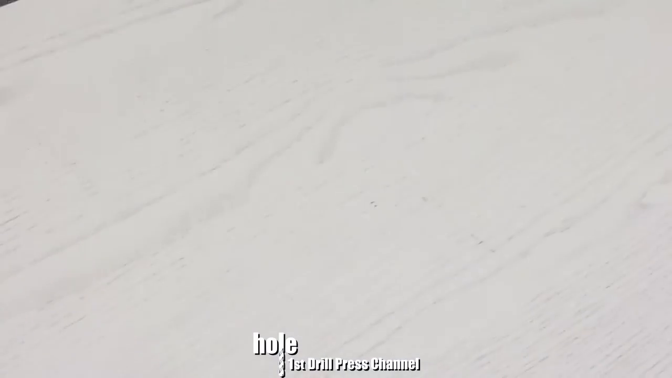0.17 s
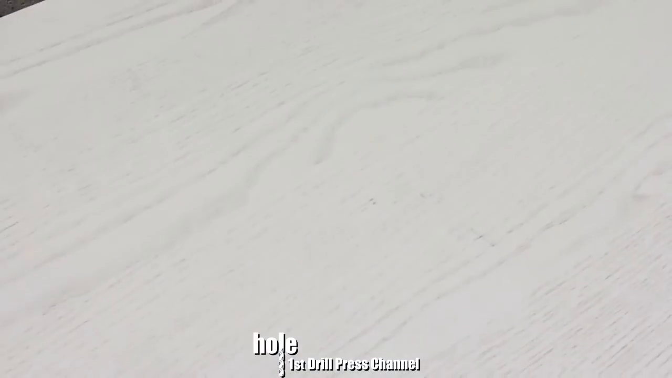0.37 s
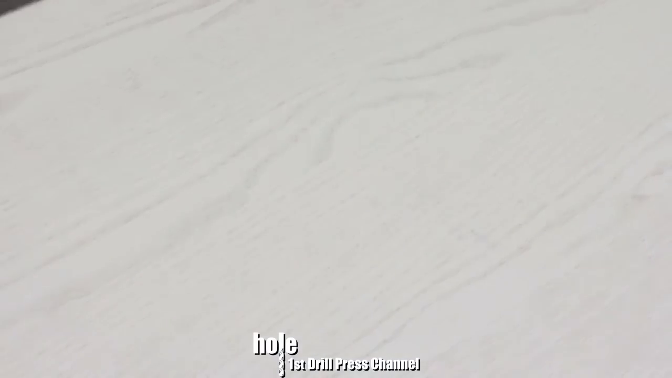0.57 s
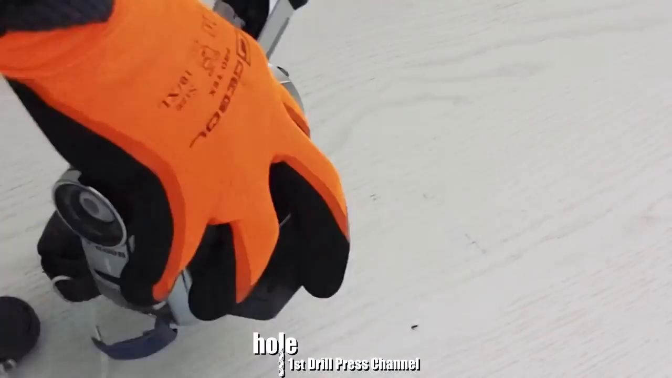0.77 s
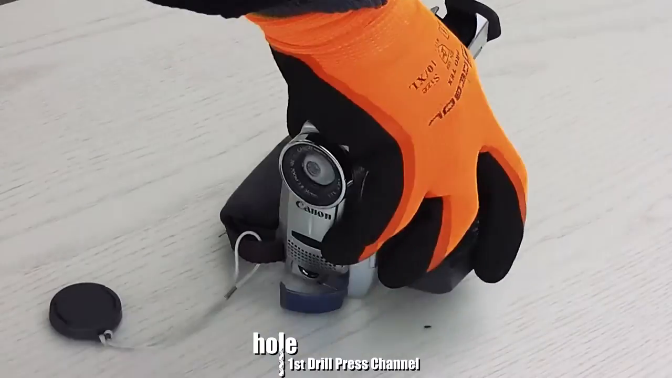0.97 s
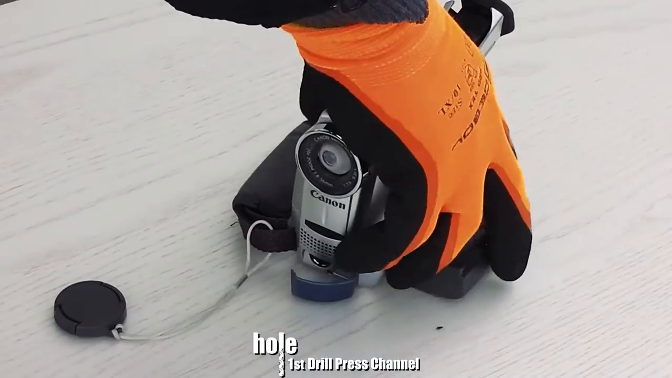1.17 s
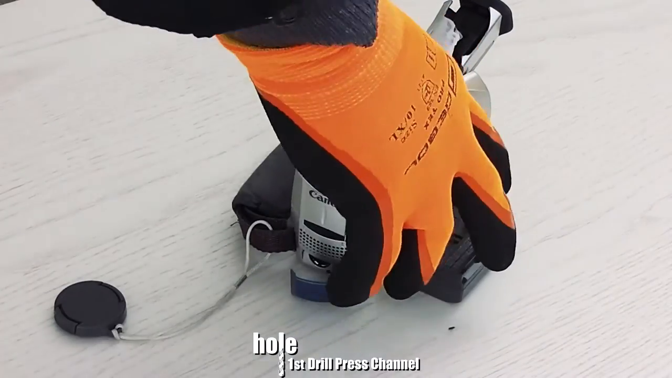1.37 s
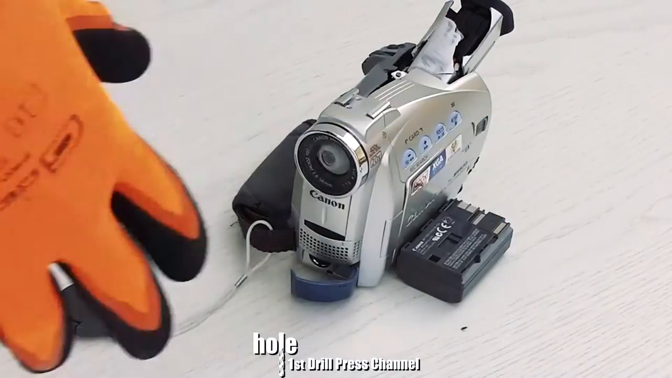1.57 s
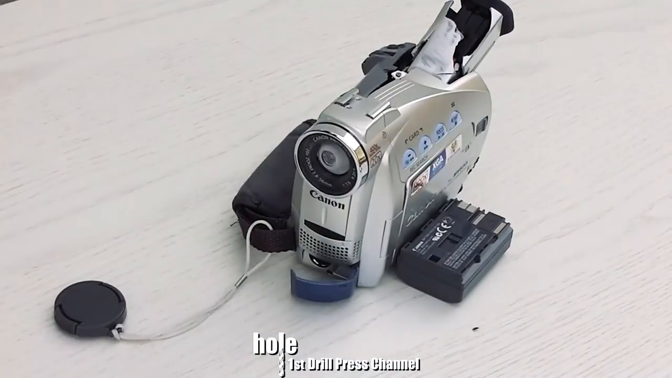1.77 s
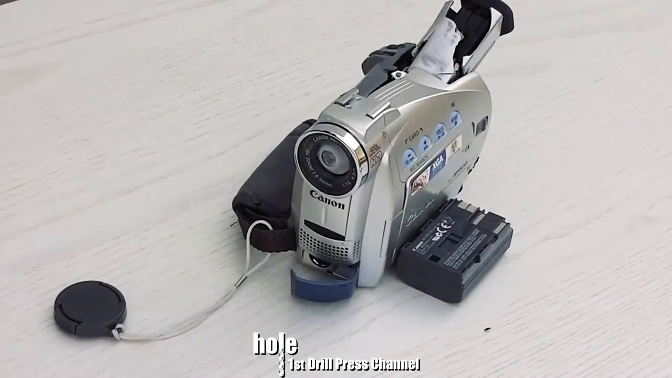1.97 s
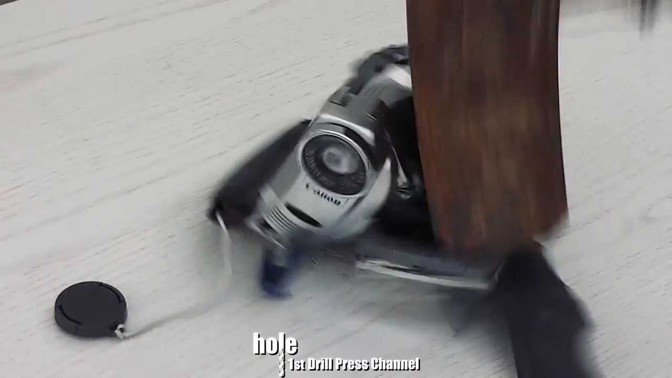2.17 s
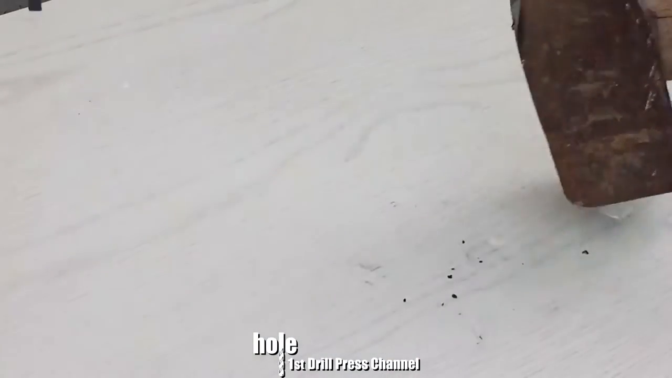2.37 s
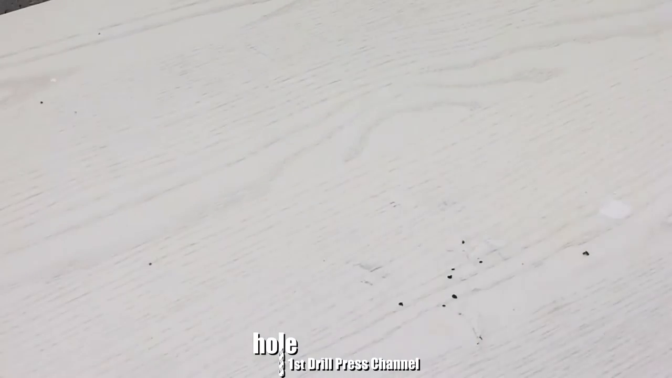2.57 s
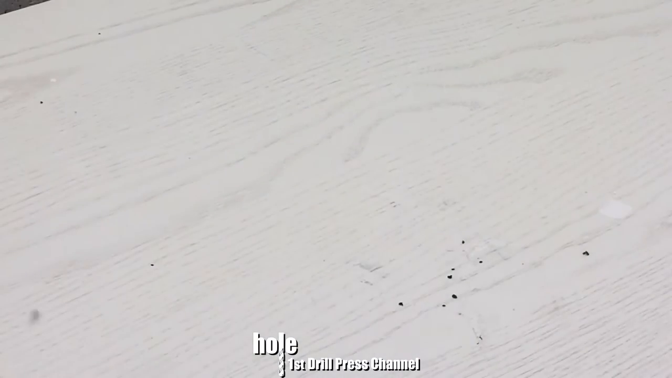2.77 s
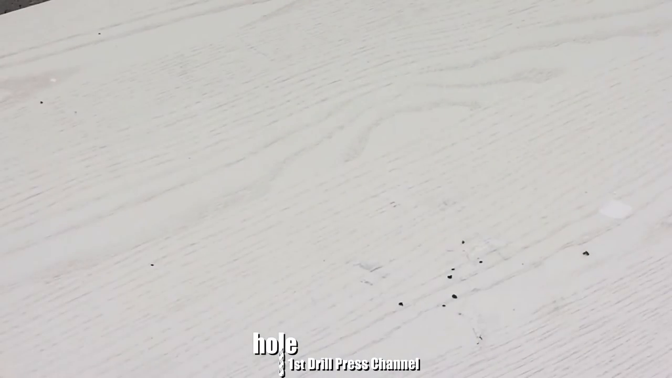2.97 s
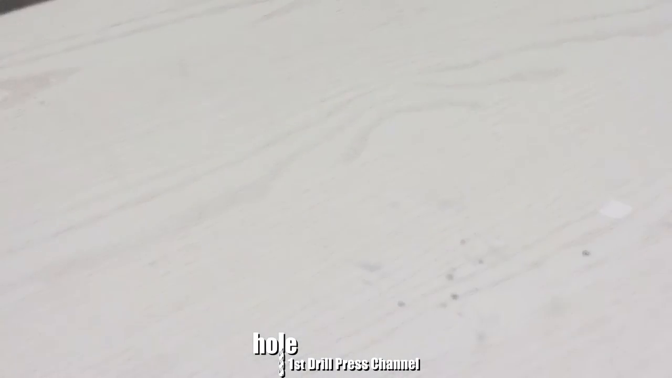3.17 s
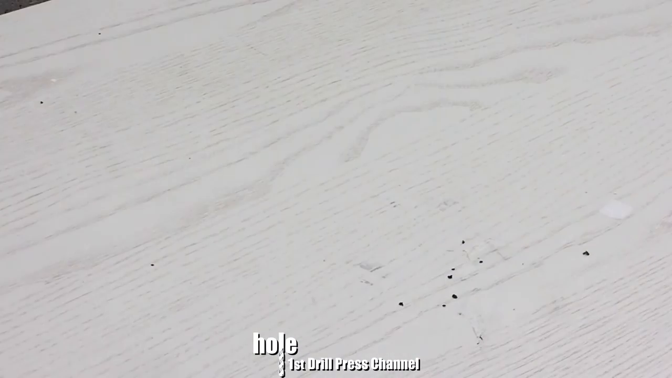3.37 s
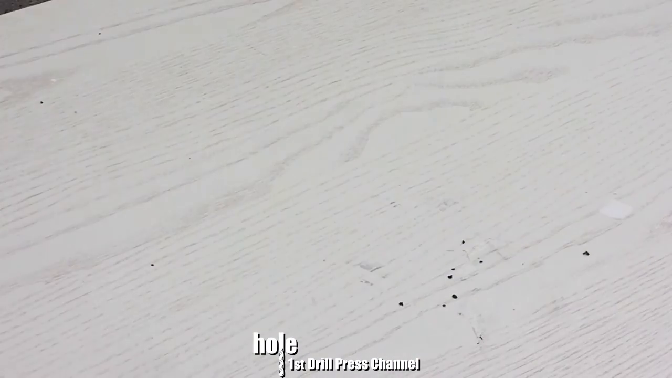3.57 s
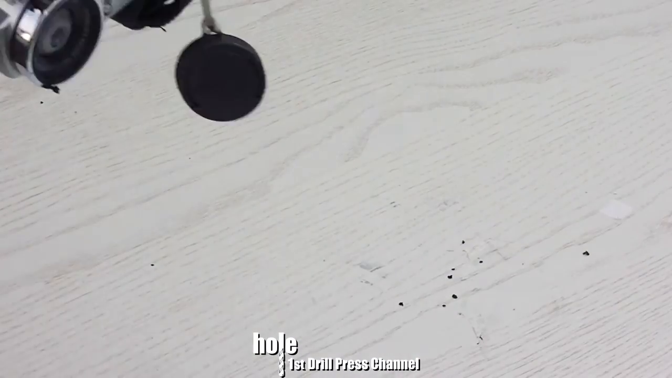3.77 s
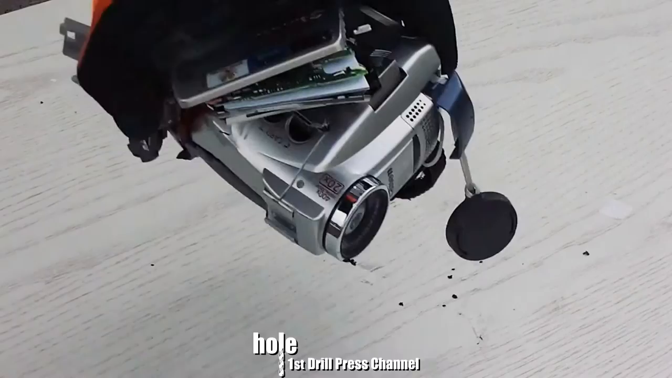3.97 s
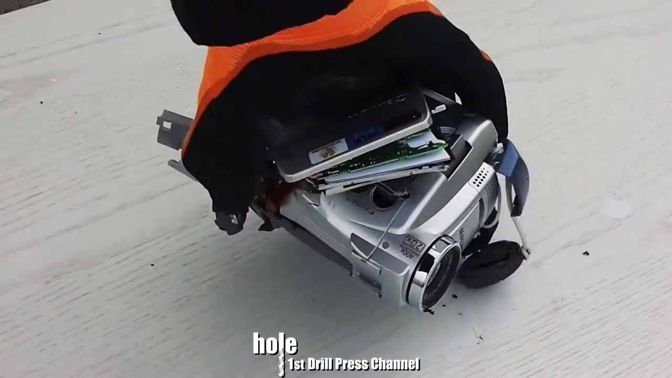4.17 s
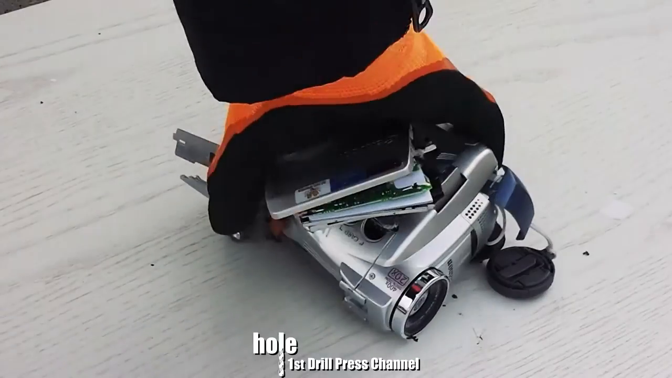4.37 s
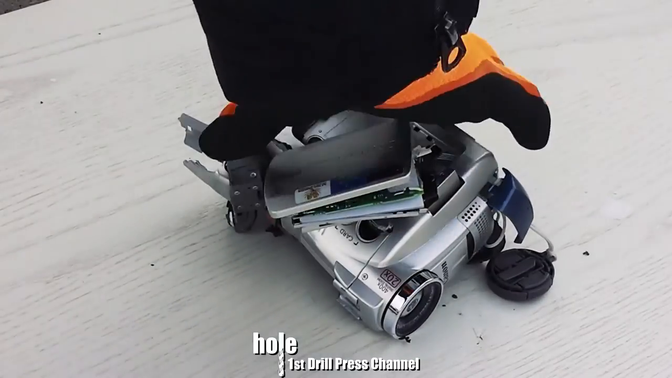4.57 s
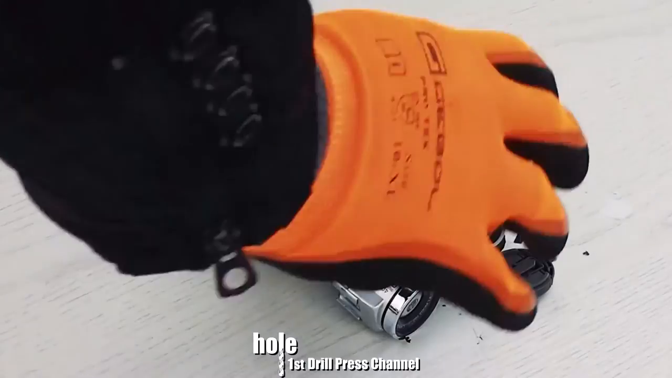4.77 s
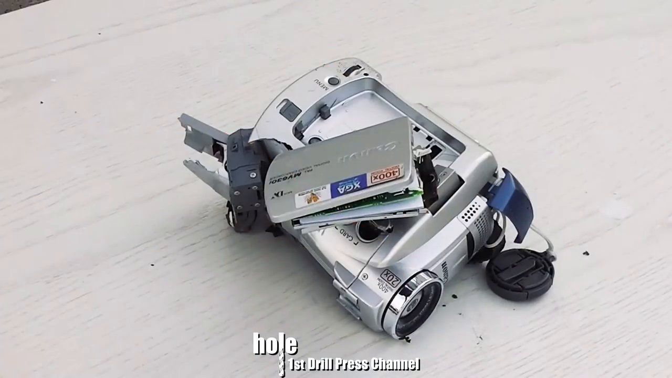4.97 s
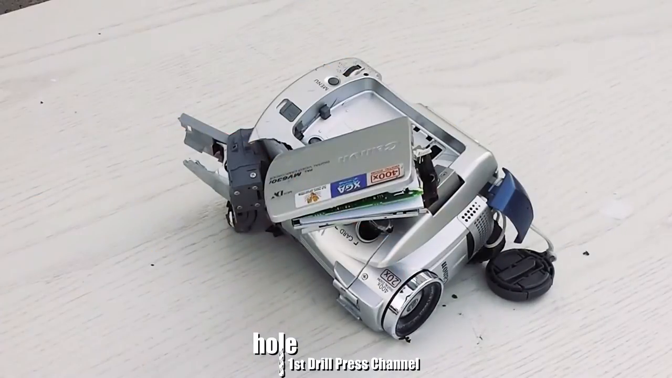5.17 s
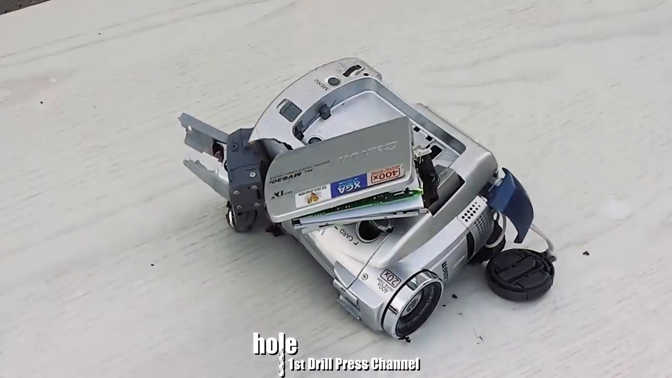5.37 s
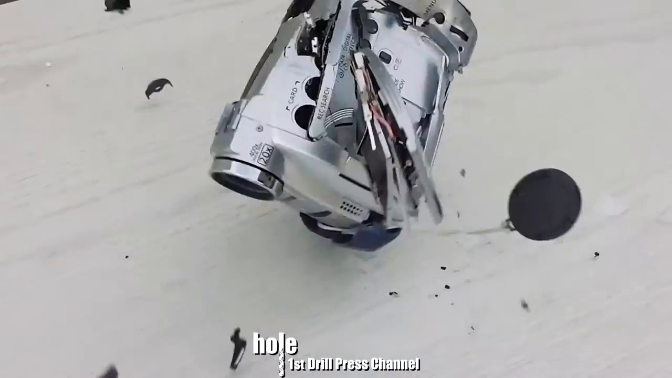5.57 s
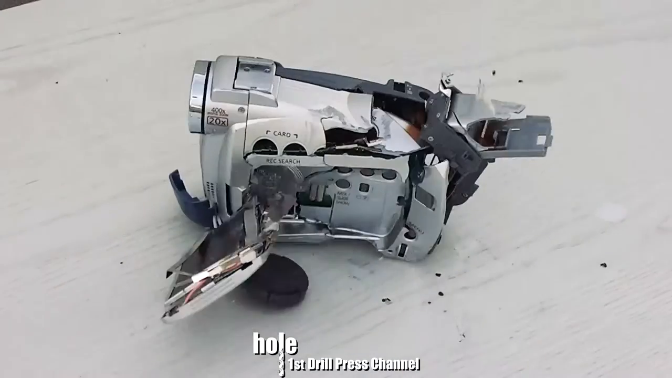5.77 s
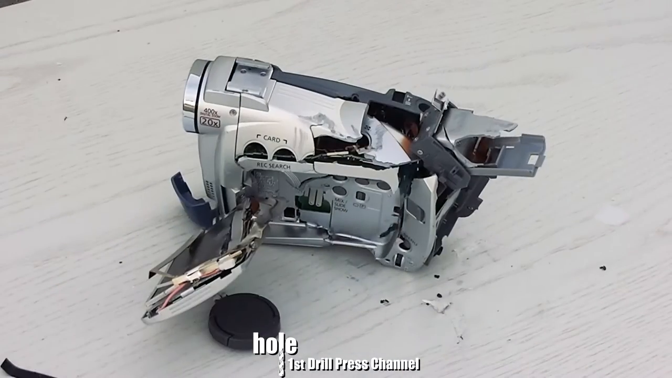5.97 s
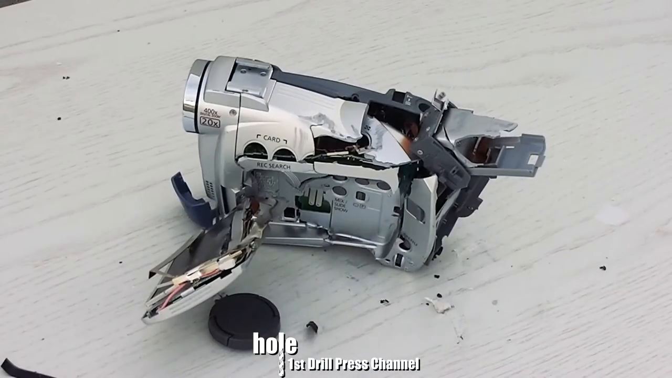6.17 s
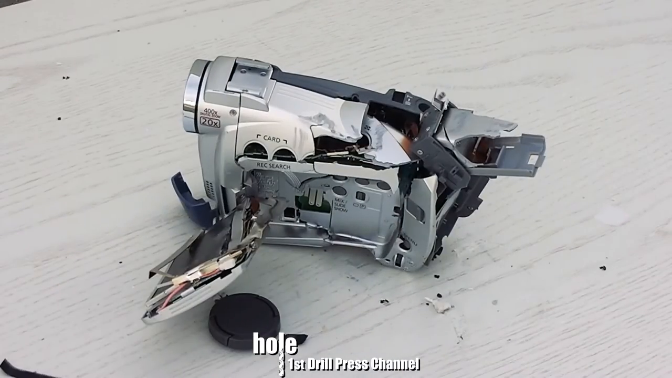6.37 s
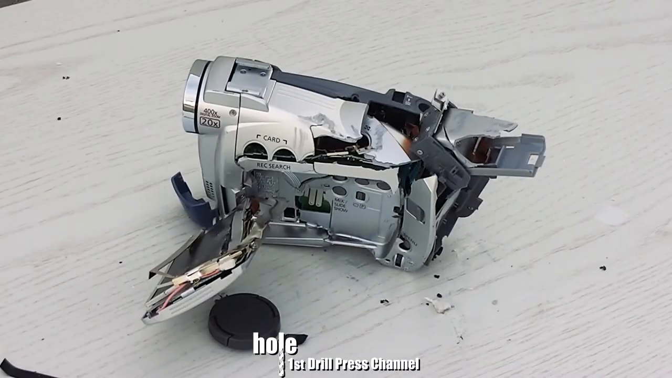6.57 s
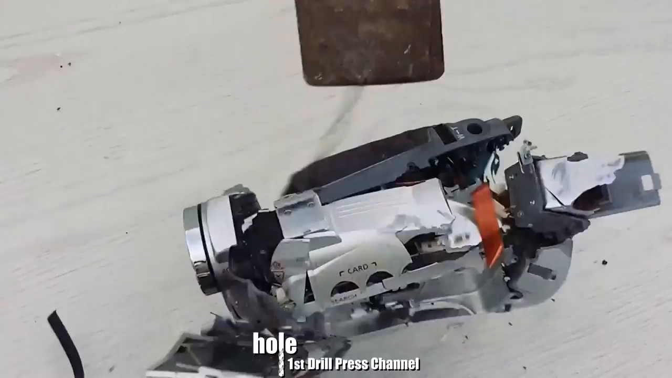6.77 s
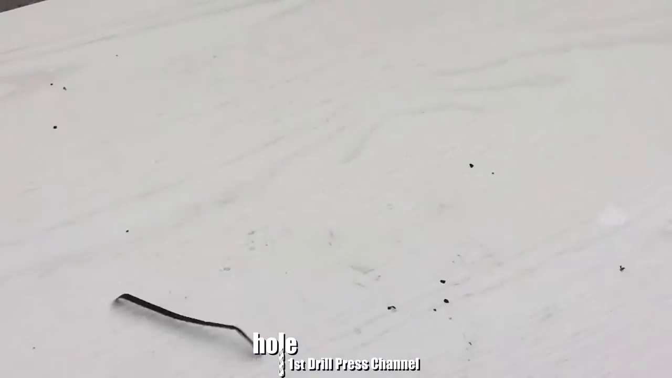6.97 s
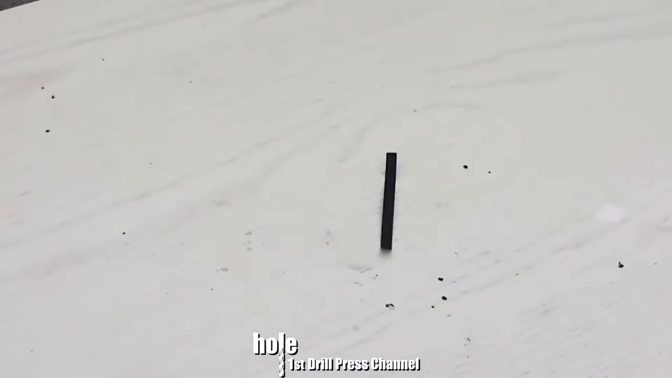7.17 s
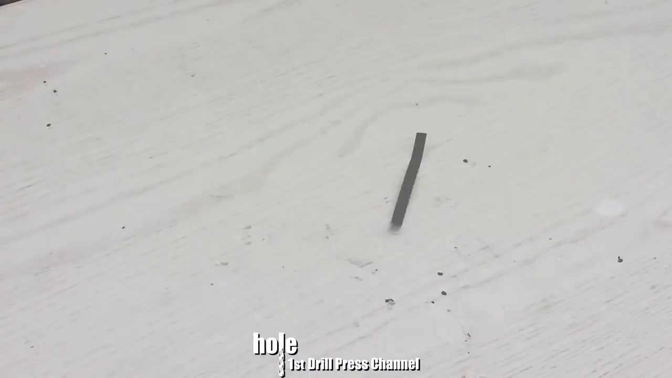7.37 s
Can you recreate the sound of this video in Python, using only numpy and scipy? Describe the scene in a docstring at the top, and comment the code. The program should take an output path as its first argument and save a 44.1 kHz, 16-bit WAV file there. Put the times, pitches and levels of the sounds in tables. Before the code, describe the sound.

Three close, brittle hammer blows crush a hollow plastic device on a juddering table, separated by cloth rustle, set-down knocks and ticking fragments.

```python
"""A wrecked camcorder tumbles on a juddering wooden table, and shards tick down; then a sledgehammer smashes it
three times, close to a handheld microphone. Contacts are sums of decaying modes and short noise bursts;
each blow adds a run of random cracks as the plastic case is crushed. Between blows a gloved hand sets the
camcorder back with knocks and taps. Sleeve and rubs are grainy noise; air and room tone are shaped noise."""
import sys
import numpy as np
from scipy import signal
from scipy.fft import rfft, irfft, next_fast_len
from scipy.io import wavfile
from scipy.ndimage import map_coordinates

SR = 44100
rng = np.random.default_rng(int(sys.argv[2]) if len(sys.argv) > 2 else 0)


def digitize_waveform(pressure):
    """Quantize a signal to 16-bit integers and store it at the path in sys.argv[1].

    Rows of a 2-D input are taken as channels; values are limited to [-1, 1].
    """
    field = np.atleast_2d(pressure).T
    bounded = np.clip(field, -1, 1)
    quanta = np.round(bounded * 32767).astype(np.int16)
    wavfile.write(sys.argv[1], SR, quanta)


N = 327222
TIME = np.arange(N) / SR  # seconds into the scene
RING = np.arange(SR // 4) / SR  # seconds since a contact
TOP_HZ = 16000  # upper band limit


def amp(db):
    """Decibels to gain."""
    return 10 ** (np.asarray(db) / 20)


def unit(x):
    """Scale to rms 1."""
    return x / np.sqrt(np.mean(x ** 2) + 1e-20)


def struck(x):
    """Scale a hit so that its first 20 ms have rms 1."""
    return x / np.sqrt(np.mean(x[..., :SR // 50] ** 2) + 1e-20)


def along(points, hz):
    """Read (frequency, value) points along a log frequency axis."""
    f, v = np.transpose(points)
    return np.interp(np.log(hz + 1), np.log(f), v)


def level_curve(rows):
    """Draw (time, level) points as one level in dB per sample."""
    times, levels = np.transpose(rows)
    return np.interp(TIME, times, levels)


def wobble(rate):
    """A smooth random curve, rate knots a second."""
    knots = rng.standard_normal(int(N * rate / SR) + 4)
    return map_coordinates(knots, [TIME * rate])


def panned(db):
    """Left and right gains for a left-minus-right level difference."""
    return amp([[db / 2], [-db / 2]])


def coloured(pair, spectrum, width):
    """Shape two unrelated signals as mid and side; stereo of rms 1."""
    n = pair.shape[1]
    m = next_fast_len(n)
    hz = np.fft.rfftfreq(m, 1 / SR)
    colour = amp(along(spectrum, hz))
    mid_side_gains = [np.ones(len(hz)), amp(along(width, hz))]
    mid, side = irfft(rfft(pair, m) * colour * mid_side_gains, m)[:, :n]
    return unit(np.array([mid + side, mid - side]))


def noise(spectrum, width, size=N):
    """Coloured stereo noise."""
    return coloured(rng.standard_normal((2, size)), spectrum, width)


def friction(spectrum, width, grain_db):
    """Rubbing surfaces give tiny slips of very uneven size."""
    unevenness = .7 * wobble(1500) + .25 * wobble(120)
    slips = rng.standard_normal((2, N)) * amp(grain_db * unevenness)
    return coloured(slips, spectrum, width)


# Stereo width close to the microphone: (frequency [Hz], side minus mid [dB])
NEAR_WIDTH = [(200, -24), (1000, -15), (3000, -8.5), (7000, -12), (15000, -7)]


def burst(spectrum, t60):
    """Modes too dense to tell apart, dying together."""
    return struck(noise(spectrum, NEAR_WIDTH, size=len(RING)) * amp(-60 * RING / max(t60, .002)))


def ring(modes, length, focus_hz, slope_db):
    """Modes struck at a new spot: those near the contact's own pitch speak loudest; length scales their t60."""
    hz, db, t60 = np.transpose(modes)[:, :, None]
    size, sign, shift = rng.standard_normal((3, len(modes), 1))
    db = db + 2 * size - slope_db * np.abs(np.log2(hz / focus_hz))
    detuned_hz = hz * (1 + 0.0074 * shift)
    waves = np.sign(sign) * np.sin(2 * np.pi * detuned_hz * RING)
    decays = amp(db - 60 * RING / (t60 * max(length, .1)))
    return struck(np.sum(waves * decays, axis=0))


def swell(rise):
    """A soft contact builds up exponentially, with rise as its time constant in seconds."""
    return 1 - np.exp(-RING / max(rise, 1 / SR))


def low_cut(x, edge_hz):
    """High-pass: small sources radiate little bass."""
    return signal.sosfilt(signal.butter(2, edge_hz, "highpass", fs=SR, output="sos"), x)


def add(track, s, sound):
    """Mix a sound in at a time."""
    start = min(max(round(s * SR), 0), N)
    track[:, start:start + sound.shape[-1]] += sound[..., :N - start]


def swells(rows):
    """Each stroke grows to its height and dies away, both exponentially."""
    total = 0
    for s, db, rise, fall in rows:
        before = (s - TIME) / max(rise, .001)
        after = (TIME - s) / max(fall, .001)
        total = total + amp(db) * np.exp(-np.maximum(before, after))
    return total


def scattered(spells, rate, spread_db):
    """Uneven contacts through each spell: (time, dB, pitch 0-1, side 0-1)."""
    for start, length, db in spells:
        for k, (late, size, pitch, side) in enumerate(rng.random(size=(40, 4))):
            if k + late < length * rate:
                yield start + (k + late) / rate, db - spread_db * size, pitch, side


# Bright contact noise, shared by ticks, onsets, knocks and splinters: (frequency [Hz], relative level [dB])
CLICK_SPECTRUM = [(500, -20), (1500, 6.5), (3000, -3.5), (6000, 7), (10000, 2), (15000, -4.5)]


def chip(hz, t60, ringing):
    """A small piece: a sharp tick, then a rattle and a short ring around its own pitch."""
    modes = [(hz, 0, t60), (hz * 0.99, -7, t60), (min(hz * 1.1, TOP_HZ), -12, t60)]
    tone = ring(modes, 0.67, hz, slope_db=-1.5) * swell(0.0002)
    around = [(hz / 8, -30), (hz / 3, -11), (hz / 2.9, -4), (hz, 0), (hz * 2.1, -4), (hz * 3, -16)]
    rattle = burst(around, t60) * swell(0.0033)
    tick = burst(CLICK_SPECTRUM, 0.019)
    return struck(low_cut(0.51 * rattle + 0.5 * tick + ringing * tone, edge_hz=1300))


# Faint noise at a contact's onset: time before the full hit [s], level against the hit [dB]
ONSET_S, ONSET_DB = 0.0023, -24.5


def with_onset(sound):
    """A contact's onset: a faint short noise starts ONSET_S before the full hit."""
    delay = round(max(ONSET_S, 0) * SR)
    onset = amp(ONSET_DB) * np.std(sound[..., :SR // 50]) * burst(CLICK_SPECTRUM, 0.0095)
    return onset + np.pad(sound, ((0, 0), (delay, 0)))[:, :len(RING)]


# Modes of the table frame: (frequency [Hz], relative level [dB], t60 before length scaling [s])
FRAME_MODES = [(134.5, -14, 0.23), (170.4, -8.5, 0.3), (210.7, -2.5, 0.074), (258, -7.5, 0.053),
               (312, -9, 0.21), (345.4, -6.5, 0.35), (387, 0, 0.09)]
# Modes of the table's top board: (frequency [Hz], relative level [dB], t60 before length scaling [s])
BOARD_MODES = [(249.7, 2.5, 0.087), (403.4, 2.5, 0.11), (482, -0.5, 0.048), (561.6, -2, 0.096),
               (674, -18, 0.14), (784, -3.5, 0.15), (817, 2.5, 0.057), (906, -5, 0.11), (1031, -6.5, 0.087)]
# Modes of the plastic case: (frequency [Hz], relative level [dB], t60 before length scaling [s])
CASE_MODES = [(1090, -9, 0.1), (1245, -7, 0.071), (1300, -13, 0.14), (1456, -5.5, 0.046),
              (1611, -3.5, 0.07), (1840, -2.5, 0.065), (2084, -3.5, 0.052), (2380, -2.5, 0.028),
              (2483, -1.5, 0.062), (2690, -2.5, 0.047), (3065, 5, 0.034), (3300, 4, 0.036),
              (3714, 3, 0.053), (3670, -5, 0.08), (4540, -9, 0.04), (5150, -5, .04)]
# Noise of the frame's boom: (frequency [Hz], relative level [dB])
BOOM_SPECTRUM = [(30, -58), (80, -32), (140, -14.5), (210, -2.5), (400, -11.5), (520, -13.5), (900, -92),
                 (2000, -100)]
# Noise of the board's knock: (frequency [Hz], relative level [dB])
KNOCK_SPECTRUM = [(200, -53), (400, -11), (560, -2.5), (950, -9.5), (1250, -17), (2000, -44), (4000, -110)]
# Noise of the hollow case: (frequency [Hz], relative level [dB])
HOLLOW_SPECTRUM = [(500, -58), (1000, -1), (1500, -3), (2200, -11.5), (3300, -17.5), (5000, -16.5),
                   (9000, -75)]


def contact(frame_db, board_db, case_db, length):
    """A heavy contact: the frame booms, the board knocks and the hollow plastic answers."""
    frame = ring(FRAME_MODES, length, focus_hz=228, slope_db=8.5) + 0.67 * burst(BOOM_SPECTRUM, 0.4 * length)
    board = ring(BOARD_MODES, length, focus_hz=657, slope_db=10) + .5 * burst(KNOCK_SPECTRUM, 0.17 * length)
    case = ring(CASE_MODES, length, focus_hz=1287, slope_db=18.0) + 0.44 * burst(HOLLOW_SPECTRUM, 0.11 * length)
    boom = amp(frame_db) * struck(frame * swell(0.0024))
    thump = amp(board_db) * struck(board * swell(0.001))
    return boom + thump + amp(case_db) * struck(case * swell(0.00034))


# The wreck bounces: (time [s], boom level [dB], hardness = knock over boom [dB], loose-part rattle level [dB])
BOUNCES = [(.002, -35.5, -8, -84), (0.015, -36, -8, -71), (0.041, -34.5, -4.5, -79), (.143, -32.5, -4, -73),
           (.149, -45.5, 10, -77), (.158, -37, -5, -90), (.215, -35, -10.5, -73), (.267, -32.5, 5.5, -49.5),
           (.358, -34, -3, -80), (.42, -32.5, -6, -78), (2.312, -41, -4, -70), (2.345, -43, -5, -57),
           (2.359, -34, -2.5, -84), (2.377, -43, 6, -85), (2.399, -45.5, 4.5, -82), (5.653, -46.5, 3, -74),
           (5.699, -44, -6.5, -57), (5.745, -53, 10, -50.5), (5.794, -41.5, -4, -73), (5.813, -42, -4, -49),
           (5.838, -40, -4.5, -58), (6.817, -45.5, -8, -45.5), (6.853, -41.5, -10, -47),
           (6.892, -42.5, -7.5, -82), (7.007, -37, -2, -47), (7.104, -45.5, 4, -47.5),
           (7.139, -44.5, -3, -43.5), (7.318, -49.5, -6, -50)]
# The table top keeps juddering: (start time [s], length [s], loudest boom level [dB])
JUDDER_SPELLS = [(0, 0.52, -45), (2.34, 0.11, -43), (5.57, .3, -46.5), (6.87, 0.29, -46)]
JUDDERS_PER_S, JUDDER_HARDNESS_DB = 32, -4
CASE_UNDER_KNOCK_DB, CASE_UNDER_RATTLE_DB = 17.5, 3
RATTLE_HZ, RATTLE_T60_S = 6170, 0.067  # pitch is scattered around this; t60 is before chip's scaling


def tumbling():
    """Harder bounces knock the board more; loose parts rattle and spells of contacts judder the table."""
    out = np.zeros((2, N))
    for s, db, hardness_db, rattle_db in BOUNCES:
        knock_db = db + hardness_db
        case_db = max(knock_db - CASE_UNDER_KNOCK_DB, rattle_db - CASE_UNDER_RATTLE_DB)
        add(out, s, contact(db, knock_db, case_db, length=0.79))
        loose_part = chip(RATTLE_HZ * 1.25 ** rng.normal(), RATTLE_T60_S, ringing=0.23)
        add(out, s - ONSET_S, amp(rattle_db) * panned(-0.87) * with_onset(loose_part))
    for s, db, _, _ in scattered(JUDDER_SPELLS, JUDDERS_PER_S, spread_db=9):
        knock_db = db + JUDDER_HARDNESS_DB
        add(out, s, contact(db, knock_db, knock_db - CASE_UNDER_KNOCK_DB, length=1.05))
    return out


# Decay of the room's answer: (frequency [Hz], t60 [s])
WALL_DECAY = [(200, 0.089), (1500, 0.058), (6000, 0.066), (14000, 0.12)]


def walls(x):
    """A short answer from the room, 5 ms late, with a decay time for each pitch."""
    hz, t, z = signal.stft(rng.standard_normal((2, SR // 3)), SR, nperseg=256)
    decay = amp(-60 * t / along(WALL_DECAY, hz)[:, None])
    tail = signal.istft(z * decay, SR, nperseg=256)[1]
    tail = np.pad(tail / np.linalg.norm(tail[0]), ((0, 0), (SR // 200, 0)))
    return signal.fftconvolve(x, tail, axes=1)[:, :N]


# Rumble over time: (time [s], level [dB])
RUMBLE_LEVEL = [(0, -59), (.55, -57), (.8, -66.5), (1.4, -62), (2.9, -63), (3.5, -55), (4.2, -59.5),
                (7.42, -61.5)]
# Midrange murk over time: (time [s], level [dB])
MURK_LEVEL = [(0, -77), (.7, -61.5), (1.0, -64), (1.8, -66.5), (2.17, -60.5), (2.6, -69.5), (3.5, -55),
              (3.9, -59.5), (5.3, -63.5), (5.48, -53.5), (5.6, -67), (6.1, -70.5), (6.45, -61), (7.42, -63)]
# Thin hiss over time: (time [s], level [dB])
HISS_LEVEL = [(0, -98), (.55, -78), (.7, -62), (.9, -58), (1.3, -68), (1.85, -60), (2.2, -65), (2.55, -83),
              (3.5, -73), (3.9, -73), (5.0, -74.5), (7.42, -73.5)]
# Colour of the rumble: (frequency [Hz], relative level [dB])
RUMBLE_SPECTRUM = [(20, -14), (50, -2.5), (150, 1), (350, -0.5), (600, -13.5), (1500, -52)]
# Colour of the murk: (frequency [Hz], relative level [dB])
MURK_SPECTRUM = [(250, -12), (500, 8), (1000, 5.5), (1600, 1.5), (2300, -11), (4000, -92)]
# Colour of the hiss: (frequency [Hz], relative level [dB])
HISS_SPECTRUM = [(1200, -11.5), (2000, -2.5), (3200, -7.5), (4300, -19.5), (8000, -27.5), (15000, -20)]
# Stereo width of the background: (frequency [Hz], side minus mid [dB])
DIFFUSE_WIDTH = [(100, -21), (700, -11.5), (3000, -6), (10000, -4.5)]


def room_tone():
    """The workshop's background: rumble, murk and a thin hiss, each drifting in level."""
    rumble = amp(level_curve(RUMBLE_LEVEL)) * noise(RUMBLE_SPECTRUM, DIFFUSE_WIDTH)
    murk = amp(level_curve(MURK_LEVEL)) * noise(MURK_SPECTRUM, DIFFUSE_WIDTH)
    hiss = amp(level_curve(HISS_LEVEL)) * noise(HISS_SPECTRUM, DIFFUSE_WIDTH)
    return rumble + murk + hiss


# Larger shards land: (time [s], nominal peak level [dB], pitch [Hz], left minus right [dB],
# t60 before chip's scaling [s])
SHARD_LANDINGS = [(0.0815, -47.5, 4000, -7, 0.039), (0.2812, -33, 3620, 4, 0.077),
                  (0.3137, -37.5, 6380, -11, 0.041), (0.4938, -34, 6600, -5, 0.05),
                  (0.5492, -38, 4910, -8, 0.036), (0.601, -27, 6780, -13, 0.057),
                  (0.8234, -30.5, 3000, 0, 0.047), (0.8523, -29, 9050, 1.5, 0.047),
                  (0.879, -31, 8200, 1.5, 0.036), (2.2638, -33, 6470, 2, 0.062),
                  (2.5394, -37.5, 4600, -1.5, 0.028), (2.5656, -34.5, 6980, 7.5, 0.036),
                  (2.7861, -34, 9500, -4, 0.03), (3.0753, -28.5, 7130, 14, 0.013),
                  (3.3534, -36.5, 8150, -15, 0.032), (3.4996, -38, 7760, 10, 0.039),
                  (4.3607, -30.5, 4500, 2, 0.039), (5.9359, -37, 6730, 1.0, 0.066),
                  (6.0826, -49, 4760, -2, 0.036), (6.157, -40.5, 9700, -1, 0.027),
                  (6.2113, -39.5, 10500, -8, 0.017), (6.2585, -36, 8700, -1, 0.049),
                  (6.323, -38, 7490, -2, 0.019), (7.17, -29, 7660, -3, 0.036),
                  (7.1863, -23.5, 4330, -7, 0.05), (7.2083, -26.5, 6560, -2.5, 0.051),
                  (7.2294, -28, 6950, -5, 0.048)]
# Small pieces skitter: (start time [s], length [s], loudest level [dB], central pitch [Hz])
SKITTER_SPELLS = [(0.856, .07, -58, 4430), (1.855, .08, -64, 2440), (2.281, .24, -63, 6460),
                  (2.649, .32, -52.5, 5520), (3.05, .5, -59.5, 2970), (4.28, .06, -56.5, 5000),
                  (5.87, .29, -59.5, 4980), (7.237, .17, -52, 6000)]
SHARD_CREST_DB = 17  # from nominal peak down to rms
PIECES_PER_S, PIECE_SPREAD_OCTAVES = 28, 1.16


def shards():
    """Pieces land with a tick and short ring each; smaller ones skitter in random runs."""
    out = np.zeros((2, N))
    for s, peak_db, hz, pan_db, t60 in SHARD_LANDINGS:
        landing = with_onset(chip(hz, max(t60, .005), ringing=0.58))
        add(out, s + 0.000983 - ONSET_S, amp(peak_db - SHARD_CREST_DB) * panned(pan_db) * landing)
    for *spell, hz in SKITTER_SPELLS:
        for s, db, pitch, side in scattered([spell], PIECES_PER_S, spread_db=9.5):
            piece_hz = hz * 2 ** (PIECE_SPREAD_OCTAVES * (pitch - .5))
            piece = chip(piece_hz, t60=0.034, ringing=0.38)
            add(out, s, amp(db) * panned(14 * (side - .5)) * piece)
    return out


# Steady rustle, before its wobble: (time [s], level [dB])
SLEEVE_LEVEL = [(0, -90), (.35, -69.5), (.72, -85), (.92, -64), (1.2, -96), (1.6, -71), (1.95, -84),
                (2.17, -60.5), (2.56, -80), (2.72, -60.5), (3.15, -59.5), (3.6, -60.5), (3.8, -64.5),
                (4.7, -68.5), (5.0, -62), (5.25, -72), (5.45, -62.5), (5.62, -76.5), (5.87, -63),
                (6.06, -75.5), (6.33, -55.5), (6.5, -71.5), (6.8, -61.5), (7.07, -80), (7.2, -57),
                (7.42, -63)]
# Brisk sleeve strokes: (time of the height [s], level [dB], rise time constant [s], fall time constant [s])
SWISHES = [(.598, -39.5, 0.0083, 0.0094), (.636, -44, 0.0044, 0.0097), (2.626, -31, 0.00095, 0.016),
           (2.875, -33, 0.011, 0.0067), (2.985, -46, 0.028, 0.023), (3.142, -39.5, 0.016, 0.011),
           (3.162, -34.5, 0.0076, 0.0084), (3.212, -43, .016, 0.0095), (3.283, -31.5, 0.0068, 0.0076),
           (3.389, -42.5, 0.0079, 0.011), (3.67, -41.5, .014, .013), (5.01, -56, 0.043, 0.044),
           (7.185, -43, 0.029, 0.014)]
# Colour of the cloth: (frequency [Hz], relative level [dB])
CLOTH_SPECTRUM = [(400, -6.5), (700, 0.5), (1450, 3), (2600, -6), (4400, 2), (5600, 0), (7500, 0.5),
                  (9500, -3.5), (12000, -10.5), (16000, -31)]
# Stereo width of cloth beside the microphone: (frequency [Hz], side minus mid [dB])
BESIDE_WIDTH = [(300, -17), (1400, -6.5), (3000, -6), (7000, -2.5), (15000, 7.5)]


def sleeve():
    """Jacket cloth rubs beside the microphone, steadily and in brisk, scratchy strokes."""
    rustle = amp(level_curve(SLEEVE_LEVEL) + 1.43 * wobble(25))
    steady = rustle * panned(3.1) * friction(CLOTH_SPECTRUM, BESIDE_WIDTH, grain_db=4.5)
    strokes = swells(SWISHES) * panned(5.2) * friction(CLOTH_SPECTRUM, BESIDE_WIDTH, grain_db=7.0)
    return steady + strokes


# board and case ring equally at EVEN_HZ; lower is board, higher is case
EVEN_HZ, TILT_DB_PER_OCTAVE = 1030, 10.5
BOARD_TOP_HZ, CASE_BOTTOM_HZ = 950, 1240  # limits of the two focus pitches


def knock(hz, click_db, length):
    """A flat, low contact rings the board; a sharp, high one rings the case."""
    tilt_db = TILT_DB_PER_OCTAVE * np.log2(hz / EVEN_HZ)
    board = ring(BOARD_MODES, 1.4 * length, min(hz, BOARD_TOP_HZ), slope_db=11.5) * swell(0.00071)
    board = board + 0.21 * burst(KNOCK_SPECTRUM, 0.1)
    case = ring(CASE_MODES, 0.98 * length, max(hz, CASE_BOTTOM_HZ), slope_db=20)
    case = case + 0.24 * burst(HOLLOW_SPECTRUM, 0.04)
    click = amp(click_db) * burst(CLICK_SPECTRUM, 0.016)
    return amp(min(-tilt_db, 0)) * board + amp(min(tilt_db, 0)) * case + click


# The camcorder is set down or nudged; full contact comes 1 ms after the time given:
# (time [s], level [dB], pitch [Hz], click relative to that level [dB])
SET_DOWNS = [(.587, -39.5, 647, -17), (.727, -36.5, 1730, -5), (.767, -48, 3080, 3), (.814, -44.5, 2460, 1),
             (.955, -43, 550, -21), (1.03, -48.5, 1190, -17), (1.192, -32.5, 1760, -13.5),
             (1.198, -44.5, 1110, -23), (1.203, -38.5, 1880, -7), (2.622, -56, 1324, -5),
             (2.867, -60, 1400, -8), (3.136, -54.5, 1100, -20), (3.266, -45, 258, -28),
             (3.351, -43, 484, -25), (3.383, -48.5, 685, -3), (3.719, -54.5, 1300, -11),
             (4.136, -35.5, 1300, -6.5), (4.153, -48, 1110, -1), (4.35, -50.5, 1290, -22),
             (4.372, -49, 1040, -24), (4.454, -32, 560, -25), (4.464, -31, 333, -25.5),
             (4.867, -56, 1050, -26), (5.348, -58.5, 890, -5)]
# Fingers tap and shift on the case: (start time [s], length [s], loudest level [dB])
FINGER_SPELLS = [(3.08, 0.72, -56), (3.98, .13, -50), (4.87, .07, -51.5), (5.36, .09, -50)]
TAPS_PER_S = 30


def setting_down():
    """An edge of the case clicks on the board and both ring; gloved fingers add lighter, damped taps."""
    out = np.zeros((2, N))
    for s, db, hz, click_db in SET_DOWNS:
        add(out, s + .001 - ONSET_S, amp(db) * with_onset(knock(hz, click_db, length=0.87)))
    for s, db, pitch, _ in scattered(FINGER_SPELLS, TAPS_PER_S, spread_db=30):
        add(out, s, amp(db) * knock(900 * 2 ** pitch, click_db=-13, length=0.36))
    return out


# Grainy rubs: handling near the microphone and scraping of debris on the table:
# (time of the height [s], level [dB], rise time constant [s], fall time constant [s])
RUB_STROKES = [(.882, -46, .014, .022), (2.872, -49, .012, 0.015), (3.08, -50, 0.015, 0.018),
               (3.16, -51.5, 0.044, 0.032), (3.286, -52, 0.014, 0.022), (4.356, -48.5, 0.0067, 0.038),
               (7.107, -37.5, .002, 0.013), (7.14, -41.5, .012, .03), (7.188, -41, .02, .06),
               (7.324, -41.5, 0.0046, .018), (7.4, -55, 0.046, .05)]
# Colour of the rubs: (frequency [Hz], relative level [dB])
RUB_SPECTRUM = [(410, -42), (700, -10), (1440, -2.5), (1770, -2), (3070, -19), (3840, -3.5), (5610, -6.5),
                (6920, -0.5), (12500, -15.5), (16000, -52)]


def grainy_rubs():
    """Handling near the microphone and debris scraping on the table: uneven noise with small ringing ticks."""
    strength = swells(RUB_STROKES)
    out = strength * friction(RUB_SPECTRUM, NEAR_WIDTH, grain_db=11)
    for s, _, rise, fall in RUB_STROKES:
        for late, size, pitch in rng.random(size=(7, 3)):
            when = s - rise + late * (rise + 2 * fall)
            tick = chip(1800 * 4 ** pitch, t60=0.033, ringing=0.54)
            add(out, when, np.interp(when, TIME, strength) * amp(-7 - 10.5 * size) * tick)
    return out


# Hammer blows: (time [s], crack level before a 2 dB trim [dB], crush length [s], first case level [dB],
# table reference level, from which frame and board are set [dB], splinter level [dB])
HAMMER_BLOWS = [(2.2200, -25, 0.019, -37, -28, -31.5), (5.5006, -28, .008, -35.5, -30, -33.5),
                (6.7521, -25.5, 0.014, -35.5, -33, -35)]
# Colour of one crack: (frequency [Hz], relative level [dB])
CRACK_SPECTRUM = [(150, -23), (500, 31), (1500, -1), (2500, -42), (4000, 12), (7000, -13), (12000, 3),
                  (16000, -14)]
CRACKS_PER_S, LOAD_T60_S = 3500, 0.049


def hammer():
    """The head sinks in through a run of cracks; the table takes the load and splinters fly."""
    out = np.zeros((2, N))
    for s, crack_db, crush, case_db, table_db, splinter_db in HAMMER_BLOWS:
        load = amp(-60 * np.maximum(RING - crush, 0) / LOAD_T60_S)  # full through the crush, then dying
        happens = rng.random(len(RING)) < CRACKS_PER_S / SR
        fractures = happens * rng.standard_normal(len(RING)) * load
        fractures[0] = 1.8  # a strong first crack
        cracks = signal.fftconvolve(fractures[None], burst(CRACK_SPECTRUM, 0.0028), axes=1)[:, :len(RING)]
        crunch = amp(crack_db - 2) * struck(low_cut(cracks, edge_hz=480))
        splinters = amp(splinter_db) * burst(CLICK_SPECTRUM, 0.072)
        add(out, s, crunch + splinters)
        add(out, s, contact(table_db - 14, table_db - 6.5, case_db, length=0.99))
        # the head bottoms out
        add(out, s + crush, contact(table_db - 11.0, table_db - 10.0, case_db - 19.0, length=1.0))
    return out


# Air swells on the microphone, strongest just before the last blow; level is before the wobble:
# (time of the height [s], level [dB], rise time constant [s], fall time constant [s])
AIR_GUSTS = [(3.63, -60, .06, .05), (5.49, -61, .04, .02), (6.02, -49, 0.025, 0.029),
             (6.2, -43.5, 0.056, 0.13), (6.39, -30, 0.019, 0.022), (6.5, -33, 0.034, 0.056),
             (6.61, -27.5, 0.066, 0.018), (6.73, -16.5, 0.038, 0.011), (7.12, -42, 0.1, 0.13),
             (7.39, -31, 0.058, 0.11)]
# Colour of the buffeting: (frequency [Hz], relative level [dB])
BUFFET_SPECTRUM = [(20, -10), (45, -11), (90, 2.5), (200, -3), (400, -24), (620, -34.5), (2000, -53),
                   (4000, -100)]


def draught():
    """Moving air pushes the two microphone ports mostly in opposite directions."""
    air = noise(BUFFET_SPECTRUM, [(30, 9.6), (200, 9.2), (1000, 8.7)])  # side well above mid
    return swells(AIR_GUSTS) * amp(1.3 * wobble(22)) * panned(2.7) * air


def scene():
    """All the contacts in the room, with handling sounds and background."""
    contacts = low_cut(tumbling() + setting_down(), edge_hz=86)
    hits = hammer() + contacts + shards()
    return hits + amp(-20.5) * walls(hits) + sleeve() + grainy_rubs() + draught() + room_tone()


def record(dry):
    """The recorder rounds off the highest peaks and cuts steeply above its band limit."""
    held = dry / (1 + np.abs(dry / amp(-18.0)) ** 4) ** (1 / 4)
    m = next_fast_len(N + SR // 2)
    gain = 1 / (1 + (np.fft.rfftfreq(m, 1 / SR) / TOP_HZ) ** 120)
    return irfft(rfft(held, m) * gain, m)[:, :N]


dry = scene()
out = record(dry)
digitize_waveform(out)
```